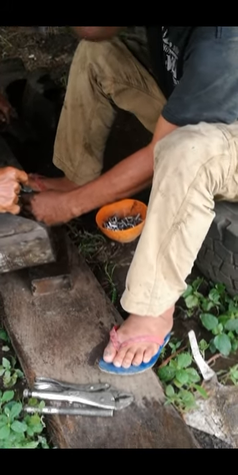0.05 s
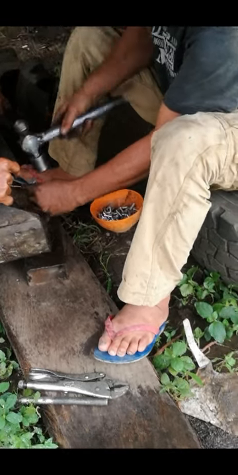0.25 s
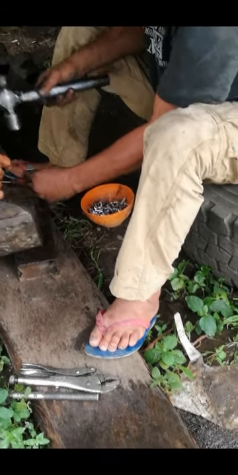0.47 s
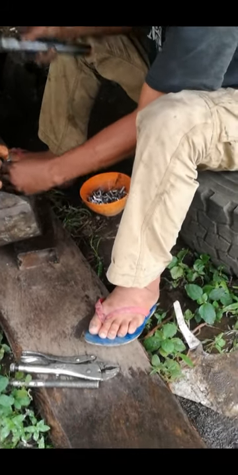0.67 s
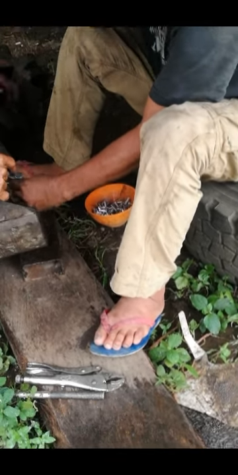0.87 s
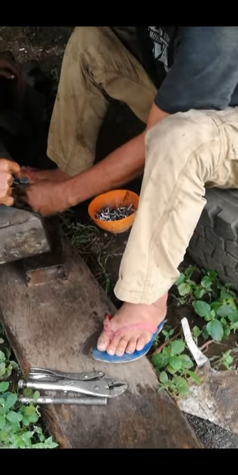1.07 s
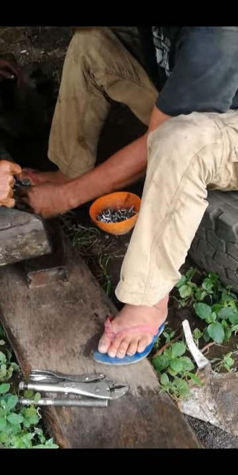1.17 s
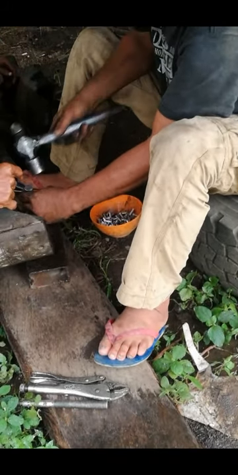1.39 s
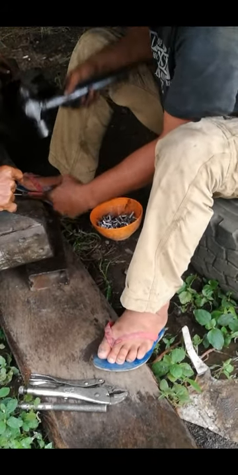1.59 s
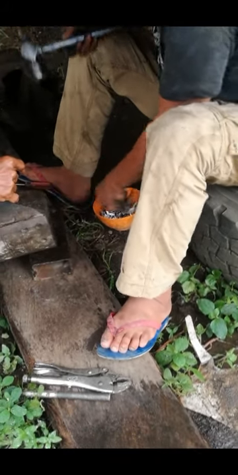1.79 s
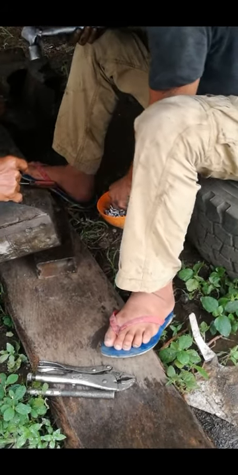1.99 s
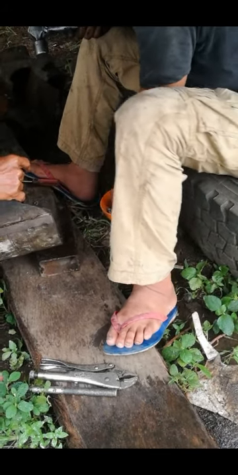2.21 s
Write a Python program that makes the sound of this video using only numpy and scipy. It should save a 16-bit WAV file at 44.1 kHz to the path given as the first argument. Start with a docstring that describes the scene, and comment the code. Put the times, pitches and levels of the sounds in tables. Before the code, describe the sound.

A hammer strikes riveted metal on a steel block twice, sharp clanks with short rings

```python
"""Riveting a brake shoe outdoors

A hammer strikes rivets on a shoe held on a steel block, left of a phone with two microphone ports.
Each blow cracks, rings decaying shoe modes with settling knocks, rattles block and planks as dense
noise bands and thumps the ground, overloading the phone. Two light taps, faint gliding chirps and
distant air noise with a low hum fill the gaps."""
import sys
import numpy as np
from scipy import signal
from scipy.fft import rfft, irfft
from scipy.io import wavfile
from scipy.ndimage import uniform_filter1d

SR = 44100
rng = np.random.default_rng(int(sys.argv[2]) if len(sys.argv) > 2 else 0)


def volts_from_decibels(level):
    """Turn decibel levels (scalar or array-like) into linear amplitude factors."""
    exponent = np.asarray(level, float) / 20
    return 10 ** exponent


def materialize(psi):
    """Save the field psi as 16-bit PCM at rate SR to the path in sys.argv[1].

    A 1-D psi becomes a single channel; in a 2-D psi each row is a channel.
    """
    bounded = np.clip(np.atleast_2d(psi).T, -1, 1)
    quanta = np.round(bounded * 32767).astype(np.int16)
    wavfile.write(sys.argv[1], SR, quanta)


N = 99225


def curve(table, hz):
    """Table of (f/Hz, value) interpolated on a log-frequency axis."""
    table = np.array(table, float)
    return np.interp(np.log(np.maximum(hz, 1)), np.log(np.maximum(table[:, 0], 1)), table[:, 1])


def shaped(x, gain):
    """Filter by a gain given as a function of Hz."""
    return irfft(rfft(x) * gain(np.fft.rfftfreq(N, 1 / SR)), N)


def unit(x):
    """Scale to rms 1."""
    return x / np.sqrt(np.mean(x ** 2))


def band(hz, width_hz, channels=1, peaks=1):
    """Noise in a bell-shaped band, rms 1; peaks is a finer gain across frequency."""
    noise = rng.standard_normal((channels, N))
    return unit(shaped(noise, lambda f: peaks * np.exp(-((f - hz) / width_hz) ** 2)))


def walk(rate_hz):
    """Smoothed random steps, spread near 1."""
    k = int(SR / rate_hz)
    steps = np.repeat(rng.standard_normal(N // k + 1), k)
    return 1.9 * uniform_filter1d(uniform_filter1d(steps, k), k)[:N]


def fade(start_s, t60_s, rise_s=0.00036):
    """Exponential rise (time constant rise_s) times exponential decay."""
    t = np.maximum(np.arange(N) / SR - start_s, 0)
    return (1 - np.exp(-t / rise_s)) * np.exp(-np.log(1000) * t / t60_s)


def air():
    """Distant outdoor noise: half-octave bands that flicker and swell, partly alike at the ports."""
    # air spectrum: f/Hz, relative density/dB per Hz
    spectrum = [(25, -16), (60, -9.5), (110, -6.5), (170, -5.5), (230, -10), (320, -14.5), (420, -23),
                (700, -27), (1000, -22), (1500, -24.5), (2270, -30), (3690, -31), (8000, -42.5),
                (15800, -54)]
    # likeness of the ports: f/Hz, correlation
    alike = [(290, .97), (640, 0.034), (1410, 0.24), (3100, -0.02)]
    # port balance: f/Hz, left minus right/dB
    balance = [(300, 0.1), (1290, 5.0), (4400, 13.5), (8120, 10.5), (15000, 1)]
    sign = np.array([[1], [-1]])
    out, swell = 0, walk(1.1)
    for hz in 25 * 2 ** np.arange(0, 9.4, .5):
        mid, side = band(hz, hz / 4, channels=2)
        c = np.clip(curve(alike, hz), -.99, .99)
        density_to_band_db = 10 * np.log10(hz)
        db = curve(spectrum, hz) + density_to_band_db + 0.64 * swell + 1.0 * walk(9.8)
        pan = volts_from_decibels(curve(balance, hz) / 2 * sign)
        pair = pan * (np.sqrt(1 + c) * mid + np.sqrt(1 - c) * side * sign)
        out = out + volts_from_decibels(db) * pair / np.std(pair.mean(axis=0))
    return volts_from_decibels(-67) * unit(out)


def hum():
    """Low distant hum: narrow noise band of wavering level, equal at both ports."""
    # hum envelope: t/s, level/dB
    envelope = np.array([(0.55, -82), (1.1, -78.5), (1.37, -76), (1.65, -76), (1.8, -69.5), (1.95, -72),
                         (2.07, -72), (2.25, -80.5)])
    db = np.interp(np.arange(N) / SR, envelope[:, 0], envelope[:, 1])
    return volts_from_decibels(db) * band(190, width_hz=17)


def chirps():
    """Faint thin tones that glide, waver and flicker in a little hiss."""
    # chirps: t/s, length/s, start f/Hz, end f/Hz, level/dB before flicker
    glides = [(0.041, 0.065, 2500, 1851, -75), (0.05, 0.072, 2880, 3021, -80), (.143, .05, 2180, 2091, -76),
              (1.5, .18, 2930, 3161, -79), (1.621, .075, 2150, 2181, -74), (1.68, 0.11, 4000, 4100, -82)]
    waver_hz, flicker_db, hiss_db = 40, 3, -5
    t, out = np.arange(N) / SR, 0
    for s, length_s, hz, end_hz, db in glides:
        u = np.clip((t - s) / length_s, 0, 1)
        turns = np.cumsum(hz + (end_hz - hz) * u + waver_hz * walk(250)) / SR
        hiss = volts_from_decibels(hiss_db) * band((hz + end_hz) / 2, 260, channels=2)
        tone = np.sin(2 * np.pi * turns) + hiss
        env = np.abs(np.sin(np.pi * u ** .6)) ** .5 * (u < 1)
        out = out + volts_from_decibels(db + flicker_db * walk(80)) * env * tone
    return out


def ring(start_s, order, db, rise_s=0.00036, damping=1, settles=()):
    """Decaying shoe modes of wavering level, struck again near one pitch as the shoe settles."""
    # shoe modes: onset f/Hz, undamped t60/s, relative level/dB at blow 1, at blow 2, when tapped
    modes = [(386.5, 0.13, -12.5, -6.5, -23), (438, 0.096, -5, -12.5, -16), (644, 0.22, -8, -7, -12),
             (804, 0.17, -4, -9.5, -21.5), (928, .185, -3, -5.5, -12.5), (1155, .19, -5.5, -2, 3.8),
             (1318.6, .15, -8, -4, -17), (1900, .14, -9, -14.5, -15), (2203, 0.11, -11, -13.5, -11),
             (2810, 0.12, -8, -12, -12), (3260, 0.081, -4, -10.5, -24), (3880, .11, -10.5, -6.5, -20),
             (5163, 0.13, -7, -3.5, -30), (6195, 0.16, -11.5, -5.5, -30.5), (6770, .11, -11, -14, -37),
             (7560, 0.15, -6, -20, -34.5), (8500, 0.23, -23, -23, -35)]
    settle_octaves, settle_rise_s, settle_damping = .12, .004, .96
    creep_share, creep_s, creep_below_hz = 0.024, .08, 1500
    t = np.maximum(np.arange(N) / SR - start_s, 0)
    creep = t - creep_s * (1 - np.exp(-t / creep_s))
    out = 0
    for mode, phase_turns in zip(modes, rng.random(len(modes))):
        hz, t60_s = mode[:2]
        env = volts_from_decibels(db + mode[order]) * fade(start_s, t60_s * damping, rise_s)
        for s, settle_hz, again_db in settles:
            near = np.exp(-(np.log2(hz / settle_hz) / settle_octaves) ** 2)
            env = env + volts_from_decibels(again_db) * near * fade(s, t60_s * settle_damping, settle_rise_s)
        share = creep_share * (hz < creep_below_hz)  # low modes creep up as the grip changes
        tone = np.sin(2 * np.pi * (hz * (t + share * creep) + phase_turns))
        out = out + volts_from_decibels(2.1 * walk(70)) * env * tone
    return out


def tap(start_s, knock_db, ring_db):
    """Light touch: faint ring, shortened by a hand on the shoe, over a dry knock of noise bands."""
    # knock bands: f/Hz, width/Hz, relative level/dB, t60/s
    knock_bands = [(528, 170, -7, 0.3), (2810, 400, -2.5, 0.074), (1400, 170, -6, 0.11)]
    knock = 0
    for hz, width_hz, db, t60_s in knock_bands:
        knock = knock + volts_from_decibels(db) * fade(start_s, t60_s) * band(hz, width_hz)[0]
    tone = ring(start_s, order=4, db=ring_db, rise_s=0.0027, damping=0.82)
    return tone + volts_from_decibels(knock_db) * knock


def rattle(start_s, rebound_s, echo_db):
    """Dense modes of block and planks: third-octave noise, crack, rebound and echo; two versions."""
    # rattle spectrum: f/Hz, relative density/dB per Hz
    spectrum = [(100, -13), (300, -12), (450, -7.5), (800, -1.5), (1400, -7), (1900, -9.5), (2600, -7),
                (3400, -10), (5300, -9.5), (7500, -14.5), (10000, -27.5), (15000, -32.5), (16000, -42)]
    # rattle decay: f/Hz, t60/s
    decay = [(100, .09), (250, 0.17), (1200, .2), (3000, .16), (6000, .16), (16000, .14)]
    # crack: f/Hz, level over the rattle/dB
    crack_gain = [(100, 4.5), (500, 5), (1500, 3), (3000, 7.5), (6000, 8), (15000, 7.5)]
    # echo decay: f/Hz, t60/s
    echo_decay = [(100, .25), (450, 0.49), (1500, 0.36), (5000, .33), (16000, 0.096)]
    crack_t60_s, rebound_db, rebound_dull_hz = 0.039, -6.5, 1500
    peaky_db, peak_spacing_hz = 2, 44.91  # unevenness of the dense modes
    peaks = volts_from_decibels(peaky_db * walk(SR * SR / N / peak_spacing_hz)[:N // 2 + 1])  # walks over frequency bins
    first = fade(start_s, crack_t60_s)
    second = volts_from_decibels(rebound_db) * fade(start_s + rebound_s, crack_t60_s)
    out = 0
    for hz in 100 * 2 ** np.arange(0, 7.4, 1 / 3):
        db = curve(spectrum, hz) + 10 * np.log10(hz / 1000)  # density to band level
        crack = first + second / (1 + hz / rebound_dull_hz)
        echo = volts_from_decibels(echo_db) * fade(start_s, curve(echo_decay, hz), rise_s=0.03)
        env = fade(start_s, curve(decay, hz)) + volts_from_decibels(curve(crack_gain, hz)) * crack + echo
        out = out + volts_from_decibels(db) * env * band(hz, hz / 6, channels=2, peaks=peaks)
    return out


def thump(start_s, length_s):
    """Half-sine pressure dip plus the ground's low shudder, a decaying noise band."""
    u = np.clip((np.arange(N) / SR - start_s) / length_s, 0, 1)
    ground = fade(start_s, t60_s=0.24, rise_s=.004) * band(45.05, width_hz=40)[0]
    return -np.sin(np.pi * u) + volts_from_decibels(-31.5) * ground


def ports(left, right):
    """Right port is spectrally shadowed, mostly in the treble, and hears later."""
    # shadow: f/Hz, cut at the right port/dB
    shadow = [(60, -0.7), (200, -1.5), (400, 1.5), (700, 2), (1300, 3), (2400, 5), (4400, 10.5), (8000, 16),
              (15000, 21.5)]
    lag_s = .0006
    return np.array([left, shaped(right, lambda f: volts_from_decibels(-curve(shadow, f)) * np.exp(-2j * np.pi * f * lag_s))])


def hammer():
    """Blows and taps at both ports: ring shared, rattle partly unlike, thump equal."""
    # blows: t/s, relative level/dB, thump level/dB, thump length/s, rebound delay/s, relative echo level/dB
    blows = [(0.2041, -9, -12, 0.0089, .017, -18), (1.3853, -10, -17.5, .006, .015, -21.5)]
    # light taps: t/s, relative knock level/dB, relative ring level/dB
    taps = [(0.887, -59.5, -61), (0.8973, -65, -57)]
    # settling knocks: t/s, f/Hz, level/dB
    settles = [(0.222, 455, -18), (0.27, 1386, -27.5), (0.285, 950, -33.5), (0.422, 446, -57),
               (1.403, 406, -21), (1.424, 1167, -23), (1.443, 1200, -25), (1.441, 3230, -36.5)]
    ring_db, rattle_db = -3, -7
    apart = .75  # share of rattle the right port hears differently
    left, right, low = 0, 0, 0
    for k, (s, db, thump_db, length_s, rebound_s, echo_db) in enumerate(blows):
        after = [row for row in settles if s < row[0] < s + 1]
        tone = ring(s, order=2 + k, db=db + ring_db, settles=after)
        a, b = volts_from_decibels(db + rattle_db) * rattle(s, rebound_s, echo_db)
        left = left + tone + a
        right = right + tone + np.sqrt(1 - apart ** 2) * a + apart * b
        low = low + volts_from_decibels(thump_db) * thump(s, length_s)
    touches = sum(tap(*row) for row in taps)
    return ports(left + touches, right + touches) + low


def scene():
    """All sources at the two ports."""
    return air() + hum() + chirps() + hammer()


def band_limit(x):
    """A steep low-pass at the top of the band."""
    return signal.sosfilt(signal.butter(12, 15980, fs=SR, output="sos"), x)


def record(dry):
    """Phone input: 18 Hz high-pass, steep 15.9 kHz low-pass, then overload saturating towards 1."""
    x = signal.sosfilt(signal.butter(1, 18, "high", fs=SR, output="sos"), dry)
    x = signal.sosfilt(signal.ellip(8, .2, 60, 15900, fs=SR, output="sos"), x)
    ceiling, knee = 1.0, 9.8  # higher knee: harder clipping
    x = x / (1 + np.abs(x / ceiling) ** knee) ** (1 / knee)
    return band_limit(x)


dry = scene()
out = record(dry)
materialize(out)
```